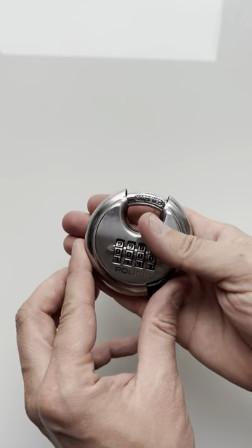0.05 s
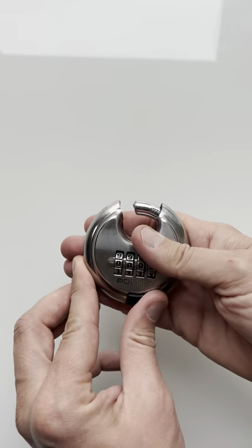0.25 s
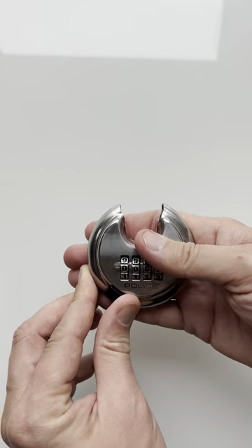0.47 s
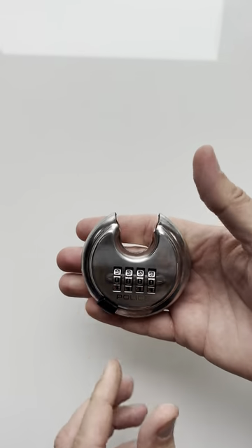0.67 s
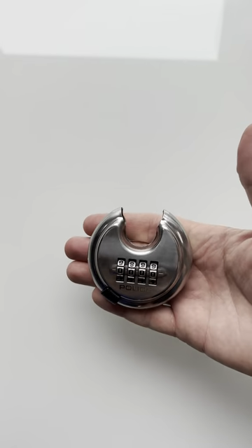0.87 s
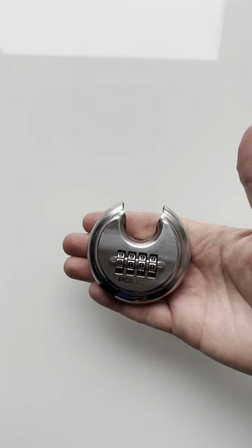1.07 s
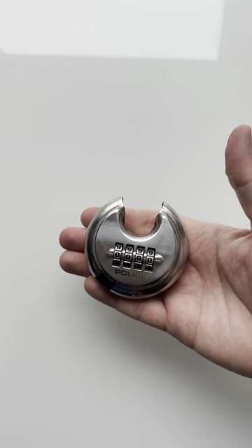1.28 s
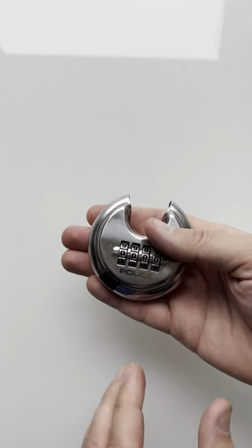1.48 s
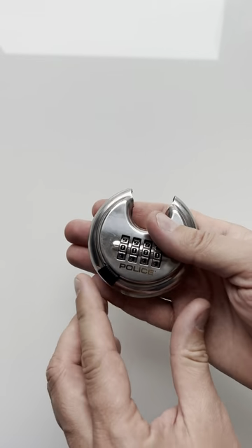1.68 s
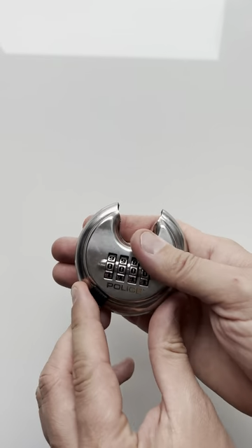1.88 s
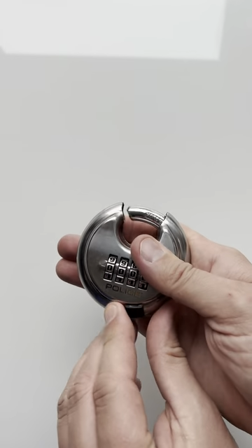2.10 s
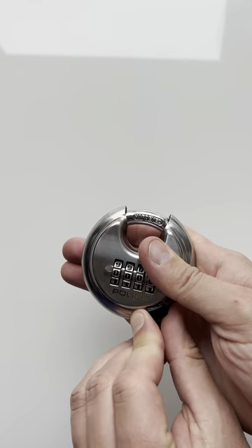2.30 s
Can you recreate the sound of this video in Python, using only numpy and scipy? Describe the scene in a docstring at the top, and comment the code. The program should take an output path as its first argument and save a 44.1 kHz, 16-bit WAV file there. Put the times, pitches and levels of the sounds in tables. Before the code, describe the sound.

A steel padlock opens close up: from 0.2 seconds its shackle scrapes, ticks and briefly squeals, snapping open near 0.4 seconds with a thin ring. After a small click, a sleeve rustles softly from 0.6 to 1.7 seconds. Around 1.9 seconds the shackle ticks and scrapes back, snapping shut near 2.2 seconds, with one last click at 2.4. A faint low hum fills the small room.

```python
"""Steel padlock, opened and shut

A disc padlock is worked in the hands, close up in a small room. The shackle scrapes round in its case as a
spring squeals, and snaps against the open stop; every tick and blow rings the hand-damped steel. A sleeve
rustles as one hand leaves and returns; the shackle scrapes back and snaps shut. A low mains hum lies
underneath."""
import sys
import numpy as np
from scipy import signal
from scipy.fft import rfft, irfft
from scipy.io import wavfile
from scipy.ndimage import uniform_filter1d

SR = 44100
rng = np.random.default_rng(int(sys.argv[2]) if len(sys.argv) > 2 else 0)


def dump(signal):
    """Clip the signal to [-1, 1] and save it as 16-bit WAV at the path in sys.argv[1]."""
    limited = np.clip(np.atleast_2d(signal).T, -1, 1)
    pcm = np.round(limited * 32767).astype(np.int16)
    wavfile.write(sys.argv[1], SR, pcm)


N = 108045
TOP_HZ = 16200


def amp(db):
    """Decibels to gain."""
    return 10 ** (np.asarray(db) / 20)


def unit(x):
    """Scale to rms 1."""
    return x / np.sqrt(np.mean(x ** 2))


def fade(t, t60):
    """A decay that loses 60 dB in t60 seconds."""
    return np.exp(-np.log(1000) * t / t60)


def add(out, start_s, x):
    """Mix x into out at a time."""
    i = max(int(start_s * SR), 0)
    out[i:i + len(x)] += x[:N - i]


def convolve(x, response):
    """Filter, keeping the length."""
    return signal.fftconvolve(x, response)[:len(x)]


def causal(gain):
    """The quickest response that has these gains from 0 Hz to half the sample rate."""
    cepstrum = irfft(np.log(gain + 1e-9))
    cepstrum[1:len(gain) - 1] *= 2
    cepstrum[len(gain):] = 0
    return irfft(np.exp(rfft(cepstrum)))


def colour(x, points, size=2049):
    """EQ through (freq_hz, gain_db) points."""
    hz, db = np.array(points, float).T
    curve_db = np.interp(np.log(np.linspace(1, SR / 2, size)), np.log(hz), db)
    return convolve(x, causal(amp(curve_db)))


def stereo_noise(points, side_db):
    """Coloured noise: a mid at rms 1, widened by a side signal."""
    mid, side = (unit(colour(rng.standard_normal(N), points)) for _ in range(2))
    return mid + amp(side_db) * side * np.array([[1], [-1]])


def wander(rate_hz):
    """Smooth random movement at rms 1."""
    hold = int(SR / rate_hz)
    steps = np.repeat(rng.standard_normal(N // hold + 1), hold)
    return unit(uniform_filter1d(uniform_filter1d(steps, hold), hold)[:N])


def rough_tone(phase, rate_hz):
    """A tone roughened by random shifts of level and phase."""
    return wander(rate_hz) * np.sin(phase) + wander(rate_hz) * np.cos(phase)


def room_tone(air_db=-70, waver_db=2.1, waver_rad=0.3):
    """Quiet room air and a wavering mains hum."""
    # mains harmonics: pitch_hz, level_db
    harmonics = [(58.8, -60.3), (118, -77), (177, -79)]
    # spectrum of the air: freq_hz, gain_db
    air_eq = [(20, 0.5), (90, -0.5), (200, -3.5), (300, -13), (450, -11.5), (800, -21), (2000, -16.5),
              (8000, -28.5), (11000, -39.5)]
    hum, t = np.zeros(N), np.arange(N) / SR
    for hz, db in harmonics:
        peak = np.sqrt(2) * amp(db + waver_db * wander(26))
        hum += peak * np.sin(2 * np.pi * hz * t + waver_rad * wander(3.8))
    return hum + amp(air_db) * stereo_noise(air_eq, side_db=-2)


def struck_steel(part, knock_db, blur=1, crack_db=-18.5, size=2049):
    """One part struck once: a crack and short resonances over a dull knock; blur widens the resonances."""
    # hand-damped resonances of the case ("open", "shut") and its small "catch": pitch_hz, level_db
    modes = {"open": [(1250, -11), (1600, -3.5), (1830, 1), (2260, 0), (2750, -4.5), (3080, -7), (3600, 1),
             (3980, 2), (5850, -2), (6580, -9), (8100, 0.5), (10200, -10), (14200, -16), (15300, -6.5)],
             "shut": [(1000, -10.5), (1350, -8), (1830, 3), (2150, -1), (2690, -3.5), (3570, -1.5),
             (4070, 0.5), (5820, -5.5), (6450, -4), (7850, 0), (11500, -11.5), (14800, -4.5)],
             "catch": [(1750, -6.5), (2350, -0.5), (3660, 1), (3930, -7.5), (4350, 2), (5900, -11),
             (7440, -1), (7830, -2), (8500, 0.5), (14400, -8)]}
    f = np.linspace(1, SR / 2, size)

    def resonance(hz, width_hz):
        return 1 / (1 + ((f ** 2 - hz ** 2) / (f * width_hz)) ** 2)

    steel = sum(amp(db) ** 2 * resonance(hz, width_hz=(169 + 0.027 * hz) * blur) / blur
                for hz, db in modes[part])
    lowest_hz = modes[part][0][0]
    crack = amp(crack_db) ** 2 * f ** 2 / (f ** 2 + lowest_hz ** 2)
    knock = amp(knock_db) ** 2 * resonance(hz=740, width_hz=300)
    return causal(np.sqrt(steel + crack + knock))  # the three add as powers


def scrapes(ticks_per_s=3500, spread_db=4.5, attack_s=0.0077, release_s=0.0067, size=8192):
    """Sliding steel catches in dense tiny ticks that ring the case; the first burst is a fading click."""
    # a faint fading click at the start, then shackle and fingers sliding on the case:
    # start_s, part, length_s, level_db, tilt_db_per_octave
    bursts = [(0, "shut", 0.0071, -54, -2.5), (0.22, "open", .024, -42, 0),
              (0.244, "open", 0.086, -57, 0.5), (0.294, "open", 0.0067, -46, -5),
              (0.322, "open", 0.014, -48, -0.5), (1.841, "shut", 0.18, -69.5, -5),
              (1.944, "catch", 0.0077, -47, -1.5), (2.079, "shut", 0.067, -42.5, -2.2),
              (2.154, "shut", 0.031, -42, 1)]
    out, t = np.zeros(N), np.arange(size) / SR
    for start_s, part, length_s, db, tilt in bursts:
        steel = struck_steel(part, knock_db=-11.5)
        ticks = (rng.random(size) < ticks_per_s / SR) * np.sign(rng.standard_normal(size))
        ticks *= amp(spread_db * rng.standard_normal(size))
        tilt_eq = [(hz, tilt * np.log2(hz / 1000)) for hz in (1000, TOP_HZ)]
        grit = colour(convolve(ticks, steel), tilt_eq)
        envelope = np.minimum(t / attack_s, 1) * np.exp(-np.maximum(t - length_s, 0) / release_s)
        add(out, start_s, amp(db) * envelope * unit(grit))
    return out


def clicks(blur, rise_s=0.0006, blow_share=0.22, size=2048):
    """Each contact builds for an instant to one sharp blow, then chatters for a few milliseconds."""
    # metal contacts: start_s, part, chatter_decay_s, then one gain_db for each EQ band
    contacts = [(0.1952, "open", 0.002, -3.5, -4, -3, -6.5, -9),
                (0.2268, "open", 0.00086, -2, -17, -2, -2.5, 12.5),
                (0.3323, "open", 0.0032, -8, -13, -13, -13, -21),
                (0.3444, "open", 0.0014, 0, 0, -16, -16, -34),
                (0.3488, "open", 0.0053, 0.5, -4, 1, -6, -23), (0.3614, "open", 0.00095, -11, 3, 6, 11, 23),
                (.365, "open", 0.0029, 6, 8, 11, 8, 4.5), (0.3747, "open", 0.0035, 1.5, -10, 3, -11.5, -12),
                (0.5639, "catch", 0.004, 1, -13, -6, -24, -36),
                (1.9547, "catch", 0.0006, -10, -1.5, -9, -3, -6),
                (2.0944, "shut", 0.00094, -6, -8, -14, -8, -2.5),
                (2.1664, "shut", 0.0038, 3, 15, 11.5, 9.5, 17),
                (2.4038, "catch", 0.003, 9.5, -7.5, -3, -2, -5.5)]
    # EQ bands of a contact, low to high: freq_hz
    bands_hz = [700, 2000, 4000, 8000, 15000]
    out, t = np.zeros(N), np.arange(size) / SR
    for start_s, part, decay_s, *gains_db in contacts:
        steel = struck_steel(part, knock_db=-27.5, blur=blur)
        envelope = np.minimum(t / rise_s, 1) * np.exp(-np.maximum(t - rise_s, 0) / decay_s)
        chatter = rng.standard_normal(size) * envelope
        force = np.sqrt(1 - blow_share) * chatter / np.linalg.norm(chatter)
        force[int(rise_s * SR)] = np.sqrt(blow_share)  # the blow's share of the energy, in one sample
        add(out, start_s, colour(convolve(force, steel), list(zip(bands_hz, gains_db))))
    return out


def squeal():
    """A rough resonance sinks in pitch as the spring sings while the shackle opens."""
    # the spring sings as the shackle opens: time_s, pitch_hz, level_db
    glide = [(.22, 1950, -71.5), (0.241, 1920, -45), (0.274, 1878, -62.5), (.325, 1790, -53),
             (0.366, 1695, -40)]
    times, hz, db = np.array(glide).T
    t = np.arange(N) / SR
    phase = 2 * np.pi * np.cumsum(np.interp(t, times, hz)) / SR
    level = amp(np.interp(t, times, db, left=-np.inf, right=-np.inf))
    return level * rough_tone(phase, rate_hz=520)


def open_ring(start_s=0.3614, pitch_hz=1692, level_db=-48, t60_s=0.36):
    """A thin steel tone hangs on after the shackle hits the open stop."""
    t = np.maximum(np.arange(N) / SR - start_s, 0)
    return amp(level_db) * fade(t, t60_s) * np.sin(2 * np.pi * pitch_hz * t)


def sleeve(hiss_trim_db=-1, rub_trim_db=0.5, flicker_db=0.5):
    """Cloth brushes as the arm swings away and back: fibre hiss over a low rub."""
    # swell of the rustle, ahead of the trims: time_s, hiss_db, rub_db
    swell = [(0, -100, -102.5), (.56, -79, -79), (.62, -64.5, -68), (0.689, -54.5, -59.5),
             (.81, -57, -66.5), (.98, -61, -69.5), (1.067, -57, -64), (1.121, -76, -78.5),
             (1.188, -59.5, -70.5), (1.286, -65, -83.5), (1.419, -57.5, -61.5), (1.601, -60.5, -66),
             (1.68, -70, -75.5), (1.79, -81.5, -93.5)]
    # spectrum of the fibre hiss: freq_hz, gain_db
    hiss_eq = [(500, -21), (1500, -5.5), (2800, 1), (4500, -5.5), (6500, 0.5), (9500, -5.5), (15500, -10)]
    # spectrum of the low rub: freq_hz, gain_db
    rub_eq = [(60, -14.5), (130, -5), (210, 1.5), (310, -11), (460, -0.5), (700, -10.5), (1100, -8),
              (2500, -45)]
    times, hiss_db, rub_db = np.array(swell).T
    t = np.arange(N) / SR
    hiss = stereo_noise(hiss_eq, side_db=-1.5) * amp(hiss_trim_db + np.interp(t, times, hiss_db))
    rub = stereo_noise(rub_eq, side_db=-1.0) * amp(rub_trim_db + np.interp(t, times, rub_db))
    return (hiss + rub) * amp(flicker_db * wander(150))


def shut_ring(start_s=2.167, pitch_hz=2780, level_db=-54, t60_s=0.28):
    """The shutting snap leaves close resonances beating in a brief, rough ring."""
    t = np.arange(N) / SR - start_s
    beating = rough_tone(2 * np.pi * pitch_hz * t, rate_hz=220)
    return amp(level_db) * (t > 0) * fade(np.abs(t), t60_s) * beating


def room(x, early_db=-12, late_db=-21.5, predelay_s=0.0023, crossover_hz=9000):
    """Quick reflections from table and wall, then a tail whose treble dies first."""
    # colour of the reverb: freq_hz, gain_db
    reverb_eq = [(1000, 5), (2100, 1), (2900, 10.5), (3400, 3.5), (4300, 5.5), (6500, 4.5), (9000, 1),
                 (15000, -8.5)]
    t = np.arange(SR) / SR
    onset = np.clip(t / predelay_s - 1, 0, 1)
    early_noise, late_noise = rng.standard_normal((2, SR))
    low = signal.sosfiltfilt(signal.butter(2, crossover_hz, fs=SR, output="sos"), late_noise)
    treble = late_noise - low
    early = onset * early_noise * fade(t, t60=0.098)
    late = onset * (low * fade(t, t60=0.56) + treble * fade(t, t60=0.32))
    response = amp(early_db) * early / np.linalg.norm(early) + amp(late_db) * late / np.linalg.norm(late)
    return convolve(x, colour(response, reverb_eq))


def microphones(x, left_lag_s=0.000018):
    """Two microphones hear the lock with different colour, the left a little later."""
    # stereo balance: freq_hz, left_over_right_db
    balance = [(300, -3), (1000, 8), (1900, 2.5), (2750, 11.5), (3600, 0), (8000, -0.5)]
    hz, db = np.array(balance).T
    f = np.linspace(1, SR / 2, N + 1)
    lean = amp(np.interp(np.log(f), np.log(hz), db) / 2)  # half to each side
    left, right = lean * np.exp(-2j * np.pi * f * left_lag_s), 1 / lean
    return irfft(rfft(x, 2 * N) * np.array([left, right]))[:, :N]


def scene():
    """The microphones face one side of the lock; the room hears all sides, which blurs the clicks' tones."""
    rubs_and_rings = scrapes() + squeal() + open_ring() + shut_ring()
    direct = clicks(blur=0.95) + rubs_and_rings
    all_sides = clicks(blur=4) + rubs_and_rings
    reverb = np.array([room(all_sides), room(all_sides)])
    return microphones(direct) + reverb + sleeve() + room_tone()


def record(dry):
    """A steep low-pass cuts the very top."""
    return signal.sosfilt(signal.ellip(10, 0.2, 70, TOP_HZ, fs=SR, output="sos"), dry)


dry = scene()
out = record(dry)
dump(out)
```